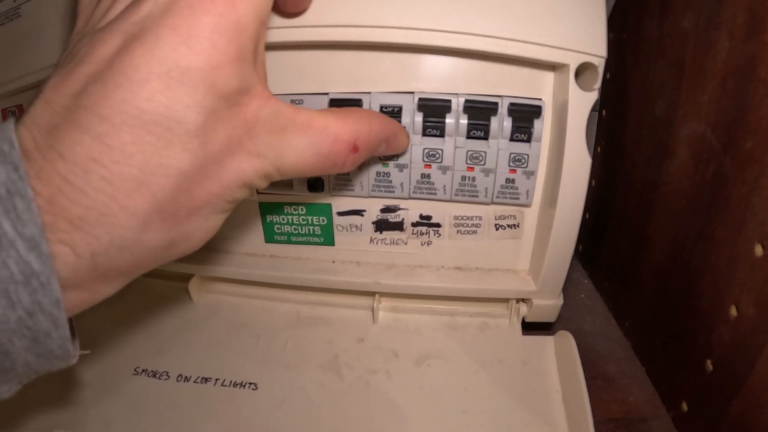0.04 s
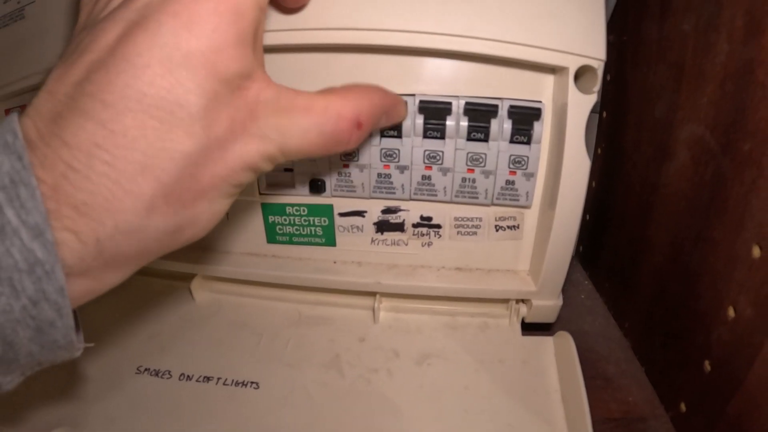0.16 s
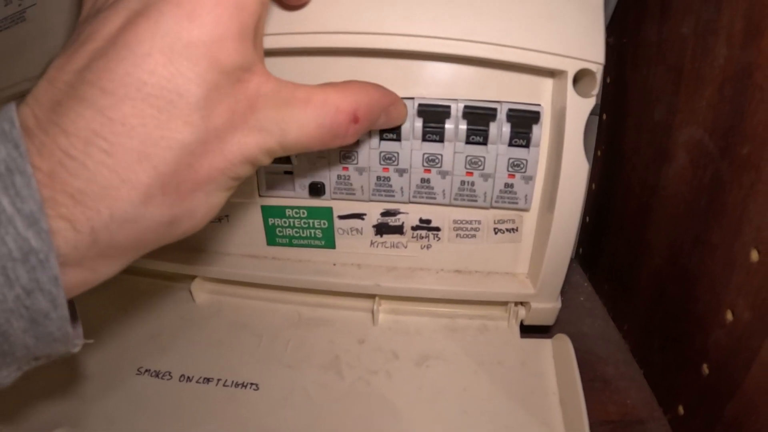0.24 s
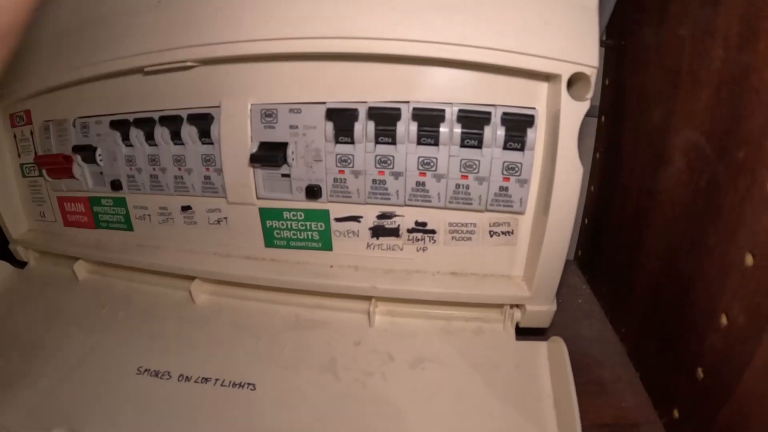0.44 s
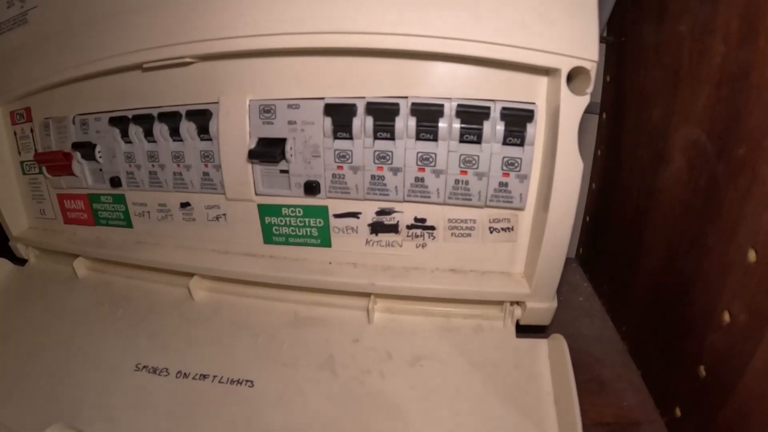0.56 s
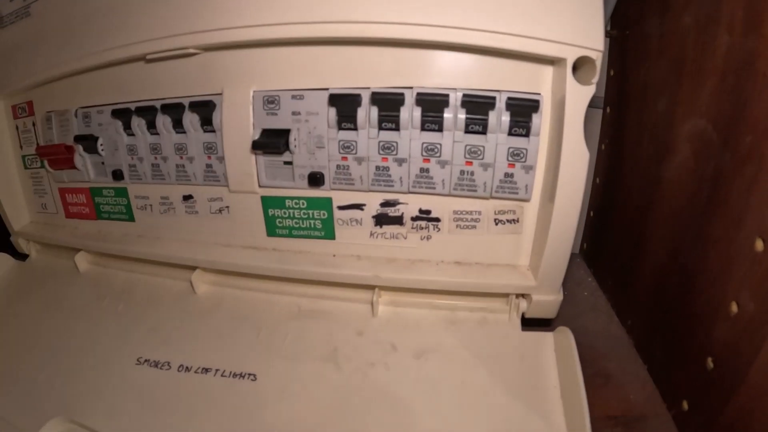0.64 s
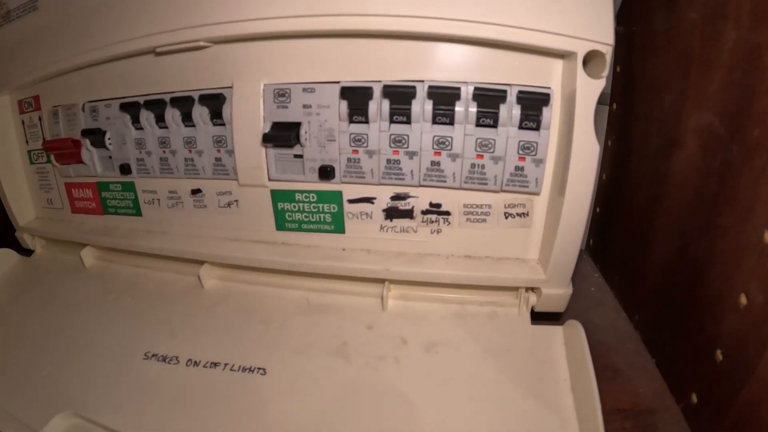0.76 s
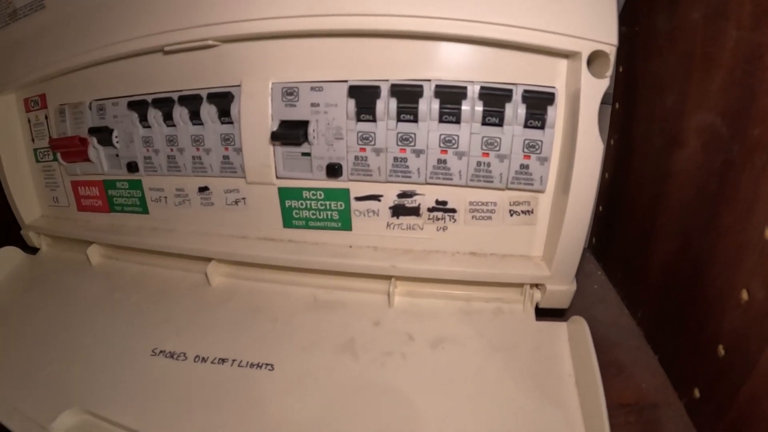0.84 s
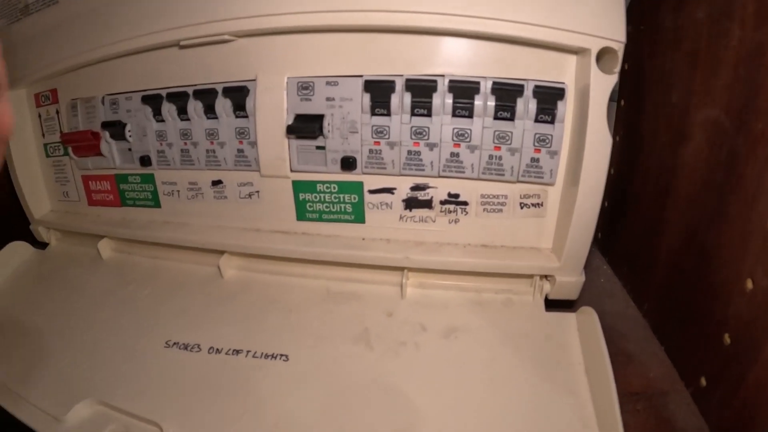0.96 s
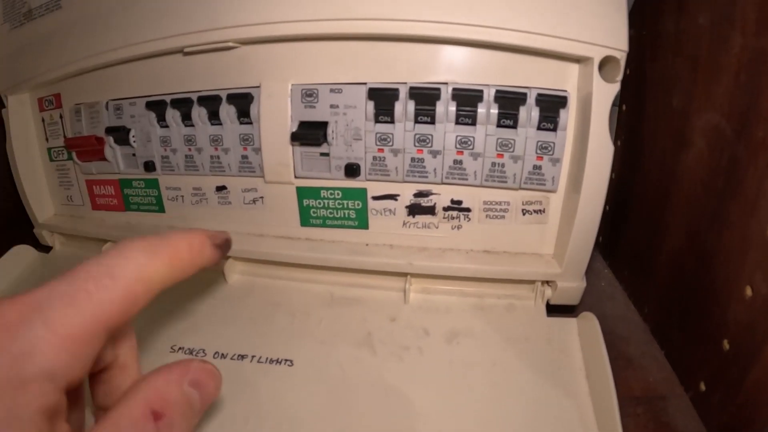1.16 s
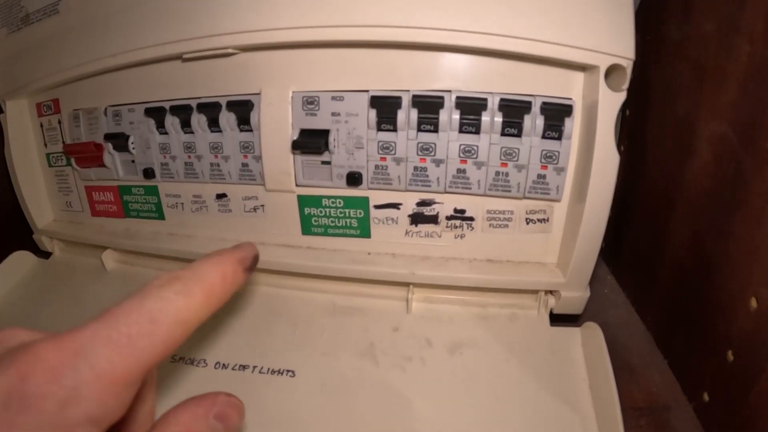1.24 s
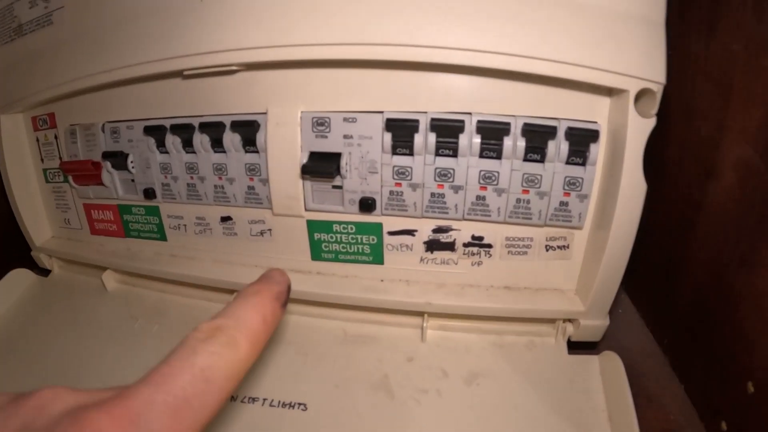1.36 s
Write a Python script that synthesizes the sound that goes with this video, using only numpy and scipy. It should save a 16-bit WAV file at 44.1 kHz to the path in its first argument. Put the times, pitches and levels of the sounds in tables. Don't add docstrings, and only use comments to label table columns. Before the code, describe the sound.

Close up, a breaker lever creaks and clicks shut, then trips immediately with a hard clack that booms the hollow plastic case; a short room tail fades into quiet hum and faint sleeve rustles.

```python
import sys
import numpy as np
from scipy import signal
from scipy.fft import rfft, irfft, next_fast_len
from scipy.io import wavfile
from scipy.ndimage import uniform_filter1d, map_coordinates

SR = 44100
rng = np.random.default_rng(int(sys.argv[2]) if len(sys.argv) > 2 else 0)


def materialize(psi):
    bounded = np.clip(np.atleast_2d(psi).T, -1, 1)
    quanta = np.round(bounded * 32767).astype(np.int16)
    wavfile.write(sys.argv[1], SR, quanta)


def magnitude_from_level(level_db):
    exponent = np.asarray(level_db, float) / 20
    return 10 ** exponent


N = 61739


def unit(x):
    return x / np.sqrt(np.mean(x ** 2) + 1e-20)


def along(points, hz):
    point_hz, value = np.transpose(points)
    return np.interp(np.log(hz + 1), np.log(point_hz + 1), value)


def noise(gain, size=N):
    m = next_fast_len(size + 4096)
    spectrum = rfft(rng.standard_normal(m)) * gain(np.fft.rfftfreq(m, 1 / SR))
    return unit(irfft(spectrum, m)[:size])


def wobble(rate_hz):
    knots = rng.standard_normal(int(N * rate_hz / SR) + 4)
    return map_coordinates(knots, [np.arange(N) * rate_hz / SR])


def add(out, start_s, sound):
    out[round(start_s * SR):][:len(sound)] += sound


def ring(modes, rise_s, scatter_db, blur_hz, length_s=0.26):
    t = np.arange(round(length_s * SR)) / SR
    pitch_hz, level_db, t60_s = np.transpose(modes)[:, :, None]
    level_chance, phase_chance = rng.standard_normal((2, len(modes), 1))
    steps = rng.standard_normal((len(modes), len(t)))
    drift = np.cumsum(steps, axis=1) * np.sqrt(2 * np.pi * blur_hz / SR)
    start_phase = np.pi * np.sign(scatter_db) * phase_chance
    phase = 2 * np.pi * pitch_hz * t + start_phase + uniform_filter1d(drift, size=100)
    envelope = magnitude_from_level(level_db + scatter_db * level_chance - 60 * t / t60_s)
    return (envelope * np.sin(phase)).sum(0) * (1 - np.exp(-t / rise_s))


# pitch_hz, density_db
FLOOR_SPECTRUM = [(25, -6.5), (80, -18), (160, -11.5), (600, -6.5), (1000, -11.5), (2700, -16.5),
                  (7000, -28.5), (9000, -44.5)]


def floor():
    level_db = -64.5 + 0.43 * wobble(5.3)
    return magnitude_from_level(level_db) * noise(lambda f: magnitude_from_level(along(FLOOR_SPECTRUM, f)))


# middle_s, half_length_s, level_db, centre_hz
SLEEVE_STROKES = [
    (0.029, 0.14, -68, 1930),
    (0.08, 0.056, -58, 400.2),
    (0.214, 0.04, -55, 664),
    (0.723, 0.041, -65, 3300),
    (0.89, 0.034, -75, 900),
    (1.13, 0.076, -66, 1380),
    (1.165, 0.051, -70.5, 189),
    (1.37, .04, -69.5, 171),
    (1.4, 0.049, -66, 3084),
]


def sleeve():
    t = np.arange(N) / SR
    width_octaves, fizz_db = 0.55, -17.5
    out = np.zeros(N)
    for middle_s, half_length_s, level_db, centre_hz in SLEEVE_STROKES:
        width = width_octaves * min(1, centre_hz / 900)

        def band(f):
            body = np.exp(-.5 * (np.log2((f + 1) / centre_hz) / width) ** 2)
            fizz_hz = 1.9 * centre_hz
            fizz_width = width_octaves * min(1, fizz_hz / 900)
            return body + magnitude_from_level(fizz_db) * np.exp(-.5 * (np.log2((f + 1) / fizz_hz) / fizz_width) ** 2)

        grain = unit(magnitude_from_level(1.5 * wobble(130)) * noise(band))
        swell = np.exp(-.5 * ((t - middle_s) / half_length_s) ** 2)
        out += magnitude_from_level(level_db) * swell * grain
    return out


# pitch_hz, t60_s
ROOM_DECAY = [(150, .5), (500, 0.43), (2000, 0.61), (6000, 0.63), (12000, .45)]
# pitch_hz, level_db
ROOM_COLOUR = [(100, -8), (300, -4), (800, 1.5), (2500, 1.5), (5000, -5), (8000, -23), (12000, -20.5),
               (14000, -29)]


def room(x):
    rise_s = 0.012
    hz, t, z = signal.stft(rng.standard_normal(SR), SR, nperseg=256)
    level_db = along(ROOM_COLOUR, hz)[:, None] - 60 * t / along(ROOM_DECAY, hz)[:, None]
    shape = magnitude_from_level(level_db) * (1 - np.exp(-t / rise_s))
    tail = signal.istft(z * shape, SR, nperseg=256)[1]
    return signal.fftconvolve(x, tail / np.linalg.norm(tail))[:N]


# start_s, level_db, rise_s
THUMPS = [
    (0.008, -50, .006),
    (0.043, -55, 0.0052),
    (0.08, -41, .008),
    (0.238, -38.5, .004),
    (0.2612, -8, 0.007),
    (0.858, -55, 0.00078),
]
# pitch_hz, level_db, t60_s
PANEL_MODES = [(212, -0.5, .2), (370, 0.5, 0.085), (551.2, 2.5, .06), (710, -14.5, .08)]
# pitch_hz, level_db, t60_s
BOX_MODES = [(102, -34.5, 0.46), (156, -21, 0.27), (209, -13.5, 0.36), (288.9, 3.5, 0.12),
             (335.3, -9, 0.36), (454, -3.5, 0.17), (551, -6, 0.17), (694.2, -7, 0.13), (818, -20.5, 0.3)]


def box():
    out = np.zeros(N + SR)
    for start_s, level_db, rise_s in THUMPS:
        before_creak = start_s < CREAKS[0][0]
        modes = PANEL_MODES if before_creak else BOX_MODES
        add(out, start_s, magnitude_from_level(level_db) * ring(modes, rise_s, scatter_db=0, blur_hz=4))
    t = np.arange(SR // 10) / SR
    push_db, push_hz = -32, 45
    push = magnitude_from_level(push_db) * np.sin(2 * np.pi * push_hz * t) * np.exp(-2 * t * push_hz)
    add(out, TRIP[1][0], push)
    return out[:N]


# pitch_hz, level_db
CRACK_SPECTRUM = [(150, -46.5), (700, -14.5), (1800, -3.5), (3000, -1), (6500, -12), (9000, -25.5),
                  (11500, -22.5), (13800, -26)]


def hits(events, modes, crack_db=1.5, rise_s=0.0002):
    crack_t60_s = 0.03
    out = np.zeros((2, N + SR))
    sound, blows = out
    t = np.arange(SR // 10) / SR
    for start_s, level_db in events:
        tone = ring(modes, rise_s, scatter_db=2, blur_hz=25, length_s=.15)
        add(sound, start_s, magnitude_from_level(level_db) * tone)
        fade = magnitude_from_level(level_db + crack_db - 60 * t / crack_t60_s) * (1 - np.exp(-t / rise_s))
        add(sound, start_s, fade * noise(lambda f: magnitude_from_level(along(CRACK_SPECTRUM, f)), size=len(t)))
        add(blows, start_s, magnitude_from_level([level_db]))
    return out[:, :N]


# start_s, level_db
CREAKS = [
    (0.1642, -47),
    (0.1685, -43.5),
    (0.1718, -44.5),
    (0.181, -52.5),
    (0.19, -50.5),
]
# pitch_hz, level_db, t60_s
SPRING_MODES = [(1157, -15.5, 0.11), (1814, -4, 0.13), (2132, -8.5, 0.11), (2519, -5, .15), (3250, -8, .12),
                (4183, 0.5, 0.093), (5410, -9, .1), (5600, -6, 0.0806), (7000, -10, .08), (10900, -16, .03)]


def spring_creak():
    return hits(CREAKS, SPRING_MODES, crack_db=1, rise_s=.002)


# start_s, level_db
TICKS = [
    (0.2213, -30),
    (0.2255, -32),
    (0.232, -37),
]
# pitch_hz, level_db, t60_s
PAWL_MODES = [(3300, -5, 0.057), (4100, -9.5, .03), (4580, -2.5, .03), (5800, -2, 0.031),
              (6750, -13.5, 0.01), (11500, -21.5, 0.022)]


def latch_ticks():
    return hits(TICKS, PAWL_MODES, crack_db=0, rise_s=0.0027)


# start_s, level_db
CLOSE = [
    (0.2337, -19),
    (0.2355, -14.5),
    (0.2398, -23),
    (0.2438, -22.5),
    (0.252, -28),
]
# pitch_hz, level_db, t60_s
CONTACT_MODES = [(694, -14, 0.21), (1680.5, -15, 0.065), (2127, -12, 0.045), (2536, 2, .03),
                 (3534, -13.5, .03), (4150, 4, 0.012), (4576, -6, .025), (5426, -16.5, .03),
                 (6632, -13.5, 0.018), (7100, -7, .02), (8500, -24.5, .02), (11020, -25, .02),
                 (12350, -20, .02)]


def contacts_close():
    return hits(CLOSE, CONTACT_MODES)


# start_s, level_db
TRIP = [
    (0.2577, -18.5),
    (0.2602, -6.5),
    (0.2629, -14.5),
    (0.2675, -21),
    (0.272, -21.5),
    (0.277, -28),
]
# pitch_hz, level_db, t60_s
LEVER_MODES = [(1311, -13.5, 0.032), (1573, -12, .05), (1938, -11, 0.026), (2132, -3, 0.033),
               (2777, -3.5, .032), (3055, -2.5, 0.026), (3730, -6, 0.043), (5007, -7.5, .035),
               (5770, -12, .026), (6550, -12, 0.022), (6900, -12.5, 0.022), (10130, -16, .02),
               (11440, -17.5, 0.022)]


def lever_trips():
    return hits(TRIP, LEVER_MODES)


def breaker():
    return spring_creak() + latch_ticks() + contacts_close() + lever_trips()


def scene():
    snaps, blows = breaker()
    boom = box()
    blow_room_db, boom_room_db = 9, -17.5
    echo = magnitude_from_level(blow_room_db) * room(blows) + magnitude_from_level(boom_room_db) * room(boom)
    return np.tile(snaps + boom + echo + sleeve() + floor(), (2, 1))


def gain_control(x):
    duck_s, duck_db, attack_s, recover_s = 0.2672, -8, 0.0089, .19
    since_s = np.arange(N) / SR - duck_s
    depth = np.clip(since_s / attack_s, 0, 1) * np.clip(1 - since_s / recover_s, 0, 1)
    x = x * magnitude_from_level(duck_db * depth)
    return x / (1 + np.abs(x / .95) ** 6) ** (1 / 6)


# pitch_hz, level_db
MIC_RESPONSE = [(60, -16.5), (110, -8.5), (150, 2.5), (8600, -0.5), (9200, -9.5), (9800, 0), (13500, -1),
                (14300, -38)]
# pitch_hz, level_db
LEFT_DIP = [(11300, 0), (12200, -9), (12900, -9), (13400, -1)]
HISS_DB = [-106, -106]


def microphone(x):
    m = next_fast_len(N + 4096)
    hz = np.fft.rfftfreq(m, 1 / SR)
    response_db = along(MIC_RESPONSE, hz) + [along(LEFT_DIP, hz), 0 * hz]
    x = irfft(rfft(x, m) * magnitude_from_level(response_db), m)[:, :N]
    hiss = [magnitude_from_level(db) * noise(lambda f: np.exp(-((f - 12500) / 1500) ** 2)) for db in HISS_DB]
    return x + np.array(hiss)


def top_cut(x):
    return signal.sosfilt(signal.butter(12, 14450, fs=SR, output="sos"), x)


def record(dry):
    mix = microphone(gain_control(dry))
    return top_cut(mix)


dry = scene()
out = record(dry)
materialize(out)
```